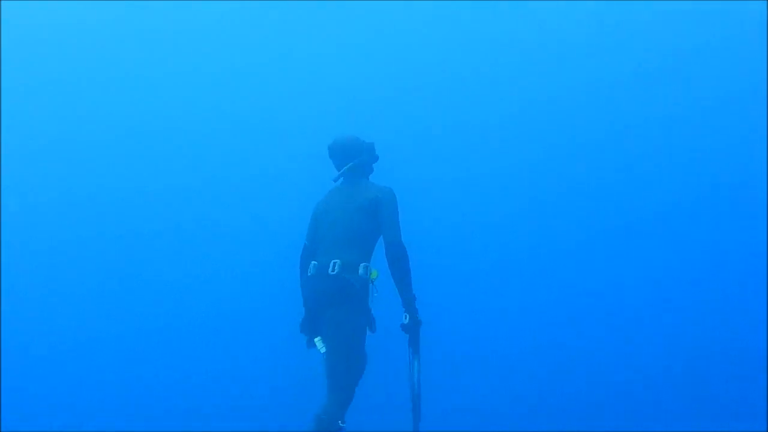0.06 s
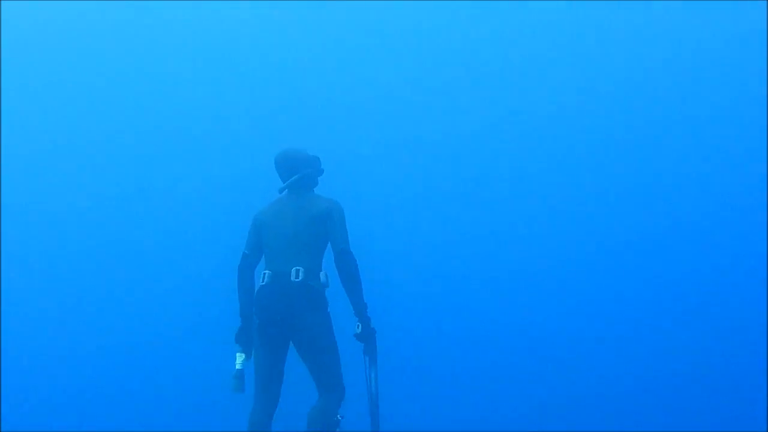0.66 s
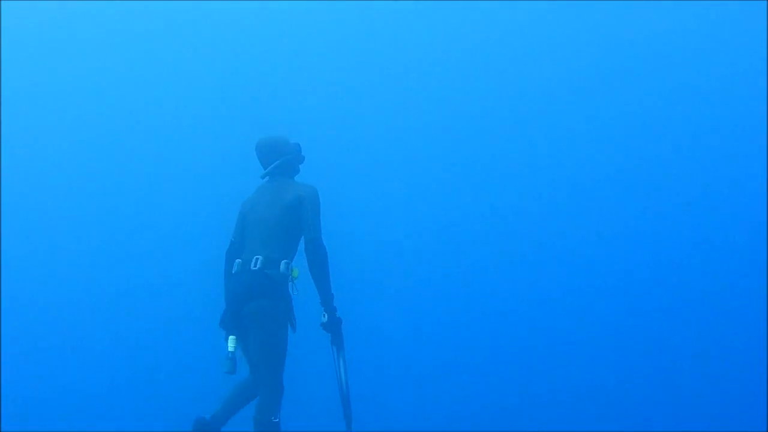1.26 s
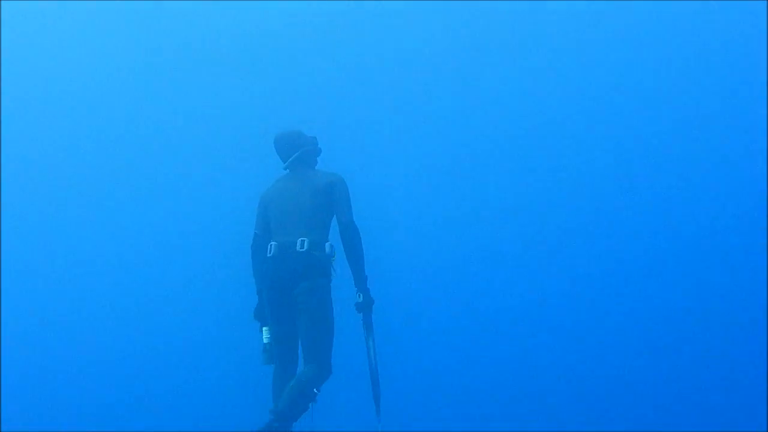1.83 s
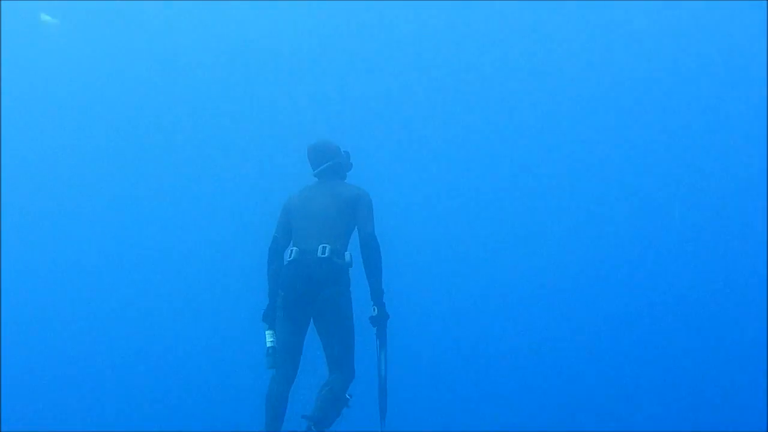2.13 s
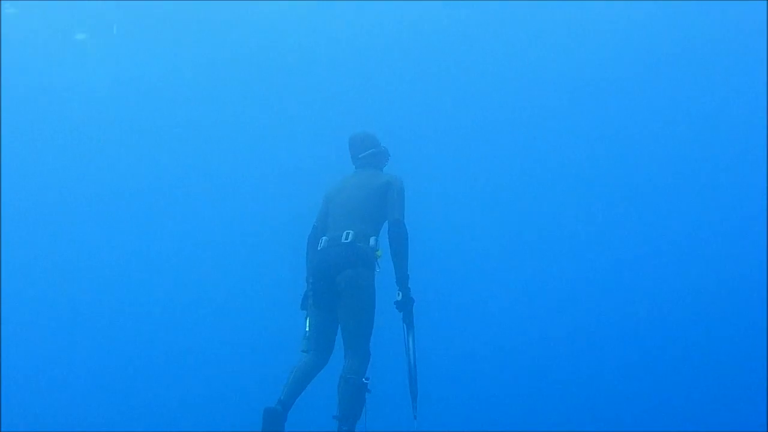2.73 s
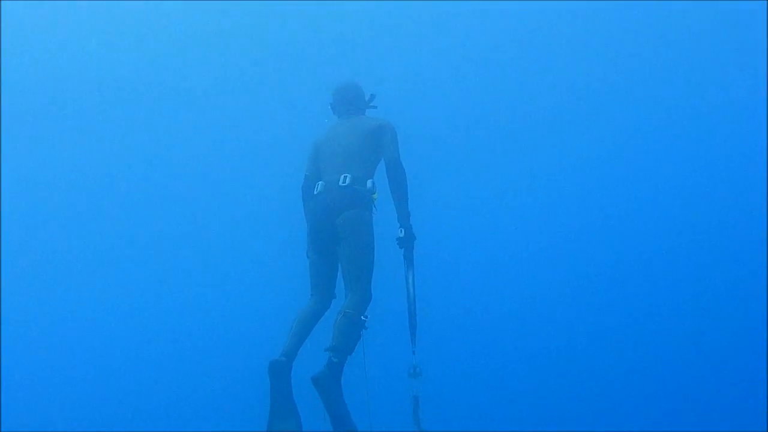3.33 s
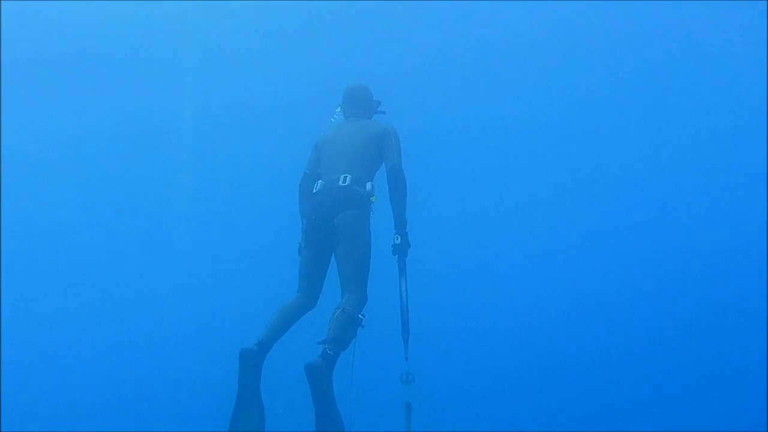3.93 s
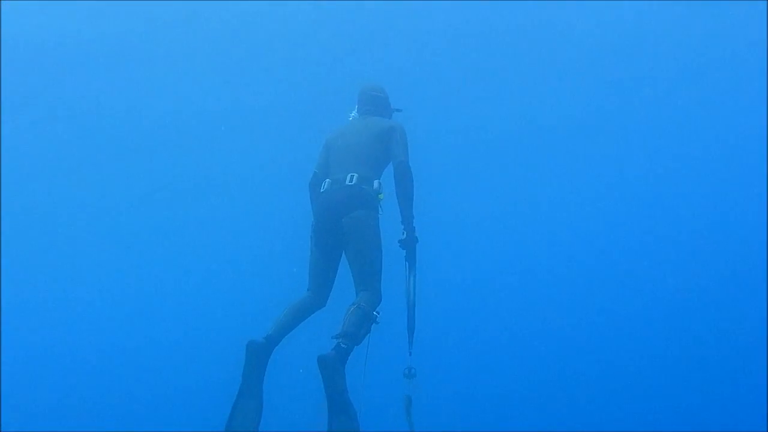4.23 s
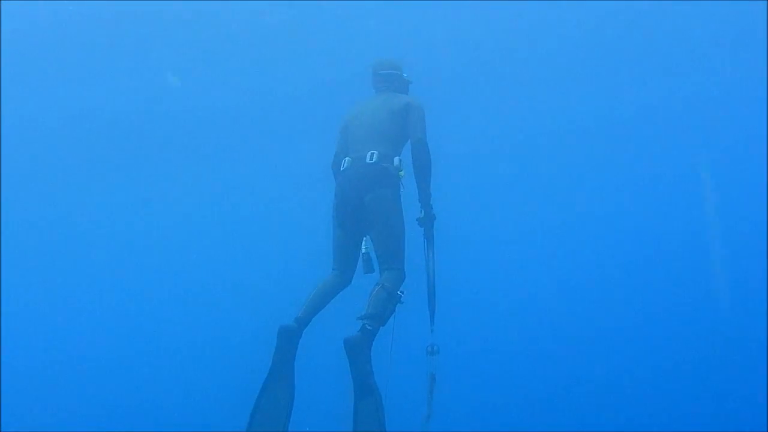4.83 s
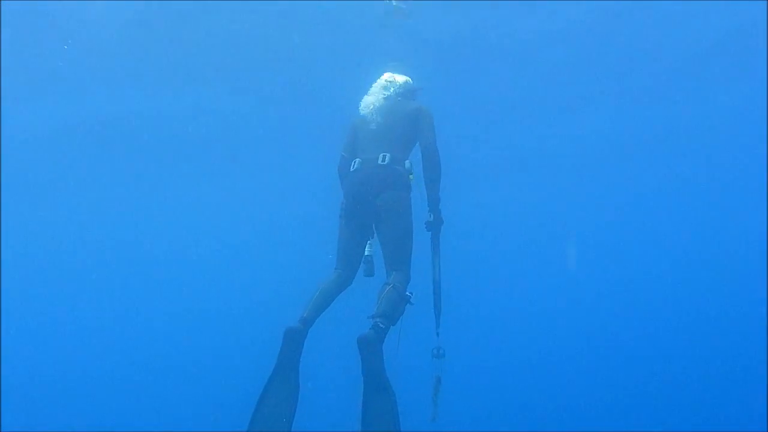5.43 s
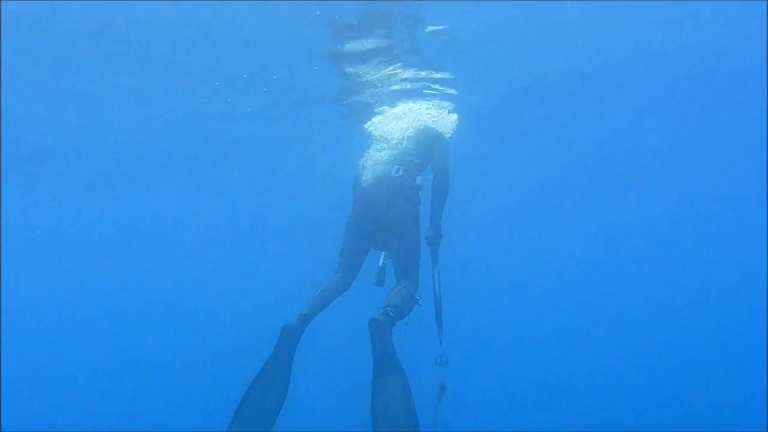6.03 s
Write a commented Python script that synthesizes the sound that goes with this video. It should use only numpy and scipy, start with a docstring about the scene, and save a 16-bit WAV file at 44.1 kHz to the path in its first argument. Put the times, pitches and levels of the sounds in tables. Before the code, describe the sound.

Underwater in open sea, heard from inside a watertight camera housing. Distant snapping shrimp make a steady, faint crackle over a dull, hollow wash of water. A soft whir swells and fades in the first two seconds. Just before the middle, something knocks once on the housing, sharp and much louder than the rest. Near the end a small cloud of bubbles gurgles briefly.

```python
"""Open sea, heard from a camera in a watertight housing while a diver drifts up to the surface.
Snapping shrimp crackle far below a dull, hollow wash of water, with stray bubbles and soft shoves.
A faint whir swells and is gone by about 2 s. At 2.7 s something knocks once on the housing, and then
the water's hollow ring slowly sinks in pitch. Past 5 s a cloud of small bubbles breaks loose,
and at the very end the waves overhead buffet the housing."""
import sys
import numpy as np
from scipy import signal
from scipy.fft import rfft, irfft, next_fast_len
from scipy.io import wavfile
from scipy.ndimage import map_coordinates

SR = 44100
rng = np.random.default_rng(int(sys.argv[2]) if len(sys.argv) > 2 else 0)


def materialize(psi):
    """Save the field psi as 16-bit PCM at rate SR to the path in sys.argv[1].

    A 1-D psi becomes a single channel; in a 2-D psi each row is a channel.
    """
    bounded = np.clip(np.atleast_2d(psi).T, -1, 1)
    quanta = np.round(bounded * 32767).astype(np.int16)
    wavfile.write(sys.argv[1], SR, quanta)


N = 272097
TIME = np.arange(N) / SR


def amp(db):
    """Decibels to gain."""
    return 10 ** (np.asarray(db) / 20)


def unit(x):
    """Scale to rms 1."""
    return x / np.sqrt(np.mean(x ** 2) + 1e-20)


def along(points, hz):
    """Read an EQ curve on a log frequency axis."""
    freqs, levels = np.transpose(points)
    return np.interp(np.log(hz + 1), np.log(freqs + 1), levels)


def bell(hz, centre, width):
    """A resonant peak of height 1."""
    return 1 / (1 + (2 * (hz - centre) / width) ** 2)


def wobble(rate):
    """A smooth random curve, rate knots a second."""
    return map_coordinates(rng.standard_normal(int(N * rate / SR) + 4), [TIME * rate])


def swell(peak_s, rise_s, fall_s, hold_s=0):
    """A gain that rises smoothly to 1, holds and falls away."""
    before, after = np.minimum(TIME - peak_s, 0), np.maximum(TIME - peak_s - hold_s, 0)
    return np.exp(-(before / rise_s) ** 2 - (after / fall_s) ** 2)


def filtered(x, response):
    """Shape x with a frequency response."""
    size = next_fast_len(N + SR // 2)
    return irfft(rfft(x, size) * response(np.fft.rfftfreq(size, 1 / SR)), size)[:N]


def noise(response):
    """Coloured noise of rms 1."""
    return unit(filtered(rng.standard_normal(N), response))


def add(track, s, sound):
    """Mix a sound into the track from time s on."""
    part = track[max(0, round(s * SR)):][:len(sound)]
    part += sound[:len(part)]


def wash(level_db, flutter_db):
    """Dull, steady noise of moving water."""
    # the water's tone: (frequency [Hz], level [dB])
    water_eq = [(10, -7), (30, 0), (90, 0), (200, -1), (270, -1.5), (340, -0.5), (450, -1), (600, -3),
                (790, -1.5), (880, -7), (1000, -11.5), (1500, -14), (2200, -23), (5000, -37.5)]
    return amp(level_db + flutter_db * wobble(22)) * noise(lambda hz: amp(along(water_eq, hz)))


def hollow_ring(start_hz, sink_from_s, sink_hz_per_s, width_hz, skirt_hz, rest_db):
    """A resonance in the wash swells and fades; its pitch holds, then sinks."""
    # surges of the ring: (peak time [s], rise [s], fall [s], level [dB])
    surges = [(.55, .45, .3, -56.5), (2.7, 0.33, .4, -55), (3.36, 0.29, .25, -55.5),
              (3.98, 0.15, 0.021, -54.5), (4.9, 0.23, .17, -56.5), (5.46, 0.32, .38, -53.5)]
    power = amp(rest_db) ** 2 + sum((amp(db) * swell(s, rise, fall)) ** 2 for s, rise, fall, db in surges)
    centre_hz = start_hz - sink_hz_per_s * np.maximum(TIME - sink_from_s, 0)
    phase = 2 * np.pi * np.cumsum(centre_hz) / SR
    band = lambda hz: np.sqrt(bell(hz, 0, width_hz)) / (1 + (hz / skirt_hz) ** 4)
    return np.sqrt(power) * unit(noise(band) * np.cos(phase) + noise(band) * np.sin(phase))


def through_walls(x):
    """The colour that snaps take on inside the housing."""
    # the crackle's overall tone: (frequency [Hz], level [dB])
    crackle_eq = [(300, -29), (900, -5.5), (1500, -1.5), (2100, 0), (3200, -4.5), (4000, -4.5), (6000, -6),
                  (7800, -10.5), (9800, -13.5), (11500, -15.5), (16000, -18.5)]
    # treble resonances of the housing: (centre [Hz], width [Hz], lift [dB])
    wall_peaks = [(1550, 200, 3.5), (2393, 140, 6), (2856, 197, 6.5), (3286, 650, 5.5), (4760, 180, 5),
                  (6240, 460, 6.5), (8670, 600, 7), (9730, 990, 3.5)]
    lift = lambda hz: sum(db * bell(hz, centre, width) for centre, width, db in wall_peaks)
    return filtered(x, lambda hz: unit(amp(along(crackle_eq, hz) + lift(hz))))


def snap_colour(dull, bright):
    """Snaps span about 2-10 kHz: a dull layer crosses over to a bright one at 6.5 kHz."""
    treble = lambda hz: 1 / (1 + (6500 / (hz + 1)) ** 6)
    middle = lambda hz: (1 - treble(hz)) / (1 + (2100 / (hz + 1)) ** 6)
    top = lambda hz: treble(hz) / (1 + (hz / 10500) ** 12)
    return through_walls(filtered(dull, middle) + filtered(bright, top))


def reef_level(start_db, fade_db_per_s):
    """The crackle's level in dB: it fades as the diver rises, with a few flurries."""
    # many shrimp snapping together: (time [s], lift [dB])
    flurries = [(.48, 2.5), (1.53, 2), (3.72, 1), (5.6, 1)]
    lift_db = sum(db * swell(s, rise_s=0.1, fall_s=0.16) for s, db in flurries)
    return start_db - fade_db_per_s * TIME + lift_db


def shrimp_bed(level_db, far_db, per_second, spread_db, colour_db, scatter_t60):
    """Countless snaps, each smeared over a few ms; the farthest merge into a hiss."""
    t = np.arange(SR // 40) / SR
    sizes = amp(spread_db * np.minimum(rng.standard_normal(N), 1.7))
    sizes *= rng.random(N) < per_second / SR
    tilt = amp(colour_db * (2 * rng.random(N) - 0.5))  # some snaps are duller, some brighter
    scatter = t * amp(-60 * t / scatter_t60) ** 2  # power arriving by many paths
    envelope = lambda size: np.sqrt(np.abs(signal.fftconvolve(size ** 2, scatter)[:N]))
    dull = envelope(sizes / tilt) * rng.standard_normal(N)
    bright = envelope(sizes * tilt) * rng.standard_normal(N)
    far = unit(through_walls(rng.standard_normal(N)))
    return amp(level_db) * (amp(far_db) * far + unit(snap_colour(dull, bright)))


def whir(hum_hz, hum_db, whine_db, peak_s, rise_s, end_s, fade_db_per_s):
    """A wavering, throbbing hum swells and dies away under narrow whining bands."""
    # bands of the whine: (centre [Hz], width [Hz], level [dB])
    whine_bands = [(1246, 190, 0), (1660, 300, 2.5), (2495, 130, -0.5), (2980, 150, -5), (3244, 115, 0.5),
                   (4340, 67, -16), (5330, 170, -21), (9700, 970, -11.5)]
    fade = amp(-fade_db_per_s * np.maximum(TIME - peak_s, 0))
    envelope = lambda rise: fade * swell(peak_s, rise, fall_s=0.2, hold_s=end_s - peak_s)
    throb_db = 2.5 * np.cos(2 * np.pi * 4.2 * (TIME - 0.747))
    pitch_hz = hum_hz + 6.03 * wobble(30.1)
    flutter_db = 2 * wobble(16.87)
    tone = np.sin(2 * np.pi * np.cumsum(pitch_hz) / SR)
    hum = amp(hum_db + throb_db + flutter_db) * envelope(rise_s) * tone
    whine = noise(lambda hz: sum(amp(db) * bell(hz, centre, width) for centre, width, db in whine_bands))
    whine_envelope = envelope(rise_s + 0.6) ** 0.73  # comes up earlier than the hum and swings less
    return hum + amp(whine_db) * whine_envelope * whine


def bubbles(cloud, glide, attack_s, roughness):
    """Stray bubbles and those of the cloud ring briefly and unevenly, rising a little in pitch."""
    # single bubbles: (time [s], pitch [Hz], level [dB], t60 [s])
    strays = [(.027, 780, -33.5, 0.013), (1.955, 970, -41, 0.0089), (2.856, 1300, -46, 0.047),
              (3.975, 614, -40, .07), (5.35, 1510, -51.5, .06), (5.438, 1080, -41, 0.035),
              (5.716, 1630, -44.5, 0.028)]
    track, t = np.zeros(N), np.arange(SR // 6) / SR
    for s, hz, db, t60 in list(strays) + cloud:
        pitch = hz * (1 + glide * np.minimum(t / t60, 1) + roughness * rng.standard_normal(len(t)))
        envelope = amp(db - 60 * t / t60) * (1 - np.exp(-t / attack_s))
        add(track, s, envelope * np.sin(2 * np.pi * np.cumsum(pitch) / SR))
    return track


def near_shrimp(trim_db, t60, direct_db, neutral_db):
    """Each near snap comes twice within a few ms: directly, then off the rippled surface."""
    # the nearest snaps: (time [s], level [dB], brightness [dB])
    snaps = [(0.2625, -41.5, -18), (0.3493, -42.5, -15), (0.4383, -39.5, -21), (0.4554, -42, -14),
             (0.512, -43.5, -15), (1.515, -41.5, -24), (1.541, -41.5, -25), (1.8818, -39, -28),
             (2.6228, -43.5, -11), (2.7726, -41.5, -20), (3.1973, -47, -8), (3.297, -38.5, -19),
             (3.699, -35.5, -19.5), (3.7364, -42, -20), (3.812, -41, -21), (4.3834, -43, -14),
             (4.4559, -41.5, -6), (5.0314, -38.5, -18), (5.5802, -39, -31), (5.6128, -36, -35),
             (5.8233, -41.5, -19), (5.877, -40, -28)]
    dull, bright, t = np.zeros(N), np.zeros(N), np.arange(SR // 40) / SR
    for s, db, bright_db in snaps:
        half_gap = rng.uniform(0.00086, 0.0023)
        for offset, path_db in [(-half_gap, direct_db), (half_gap, 0)]:
            burst = amp(db + trim_db + path_db - 60 * t / t60) * rng.standard_normal(len(t))
            add(dull, s + offset, burst)
            add(bright, s + offset, burst * amp(np.minimum(bright_db - neutral_db, 8)))
    return snap_colour(dull, bright)


def shoves(push_s):
    """Each eddy presses on the housing and lets go."""
    # soft shoves of water: (time [s], level [dB])
    eddies = [(0.859, -44.5), (1.902, -44), (2.695, -43), (3.299, -46), (4.684, -44)]
    track, age = np.zeros(N), np.arange(SR // 8) / SR / push_s
    for s, db in eddies:
        add(track, s, amp(db) * 2 * age * (2 - age) * np.exp(-age))
    return track


def knock(at_s, gain_db, push_db, push_s, soft_hz, leak_hz):
    """A blunt blow rings the housing and squeezes the air in it; the pressure then leaks away."""
    # modes of the housing: (frequency [Hz], level [dB], t60 [s])
    modes = [(1174, 0, .0105), (780, -17, .022), (1400, -16, .009)]
    track, t = np.zeros(N), np.arange(SR // 10) / SR
    ring = sum(amp(db - 60 * t / t60) * np.sin(2 * np.pi * hz * t) for hz, db, t60 in modes)
    squeeze = amp(push_db) * np.exp(-t / push_s)
    add(track, at_s, amp(gain_db) * (ring + squeeze))
    return filtered(track, lambda hz: 1j * hz / (leak_hz + 1j * hz) / (1 + (hz / soft_hz) ** 8))


def bubble_cloud(at_s, length_s, count, centre_hz, spread_octaves, level_db, fade_db, t60):
    """Rows for bubbles(): a cloud breaks loose, crowded at first, then sparser and fainter."""
    ages = (np.arange(count) / count) ** 2
    pitches = centre_hz * 2 ** (spread_octaves * rng.uniform(-1.02, 1, count))
    return [(at_s + length_s * age, hz, level_db - fade_db * np.sqrt(age), t60)
            for age, hz in zip(ages, pitches)]


def surface_sway(peak_s, level_db, corner_hz):
    """Slow pressure swings from the waves overhead."""
    rumble = noise(lambda hz: hz / (1 + (hz / corner_hz) ** 3))
    return amp(level_db) * swell(peak_s, rise_s=0.05, fall_s=1) * rumble


def scene():
    """Water, whir, shrimp and the knock over the microphone's own hiss."""
    water = wash(level_db=-51.5, flutter_db=0.1)
    water += hollow_ring(start_hz=657.7, sink_from_s=2.9, sink_hz_per_s=24,
                         width_hz=81, skirt_hz=204, rest_db=-62)
    cloud = bubble_cloud(at_s=5.192, length_s=0.14, count=18, centre_hz=1240, spread_octaves=0.64,
                         level_db=-44, fade_db=9, t60=0.029)
    water += bubbles(cloud, glide=0.041, attack_s=0.0005, roughness=0.69)
    water += shoves(push_s=0.0063)
    water += surface_sway(peak_s=5.96, level_db=-49, corner_hz=6)
    drone = whir(hum_hz=729, hum_db=-51.5, whine_db=-60,
                 peak_s=0.67, rise_s=0.4, end_s=1.66, fade_db_per_s=10.5)
    reef_db = reef_level(start_db=-64.5, fade_db_per_s=0.2)
    shrimp = shrimp_bed(reef_db, far_db=3, per_second=170, spread_db=5.5, colour_db=4, scatter_t60=0.0088)
    shrimp += near_shrimp(trim_db=-2.5, t60=0.016, direct_db=-8, neutral_db=-16)
    hiss = amp(-74) * rng.standard_normal(N)
    blow = knock(at_s=2.6818, gain_db=-9.2, push_db=-12.5, push_s=0.0026, soft_hz=1850, leak_hz=4.5)
    return (water + drone + shrimp + hiss + blow)[None]


def record(dry):
    """The camera keeps nothing above 16 kHz."""
    return filtered(dry[0], lambda hz: hz < 16000)[None]


dry = scene()
out = record(dry)
materialize(out)
```